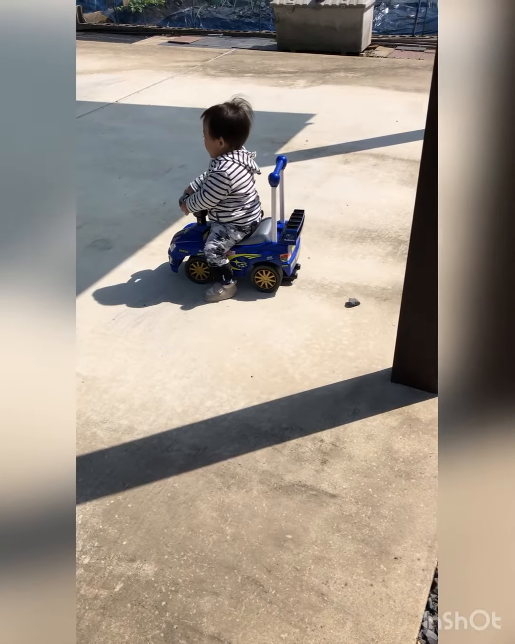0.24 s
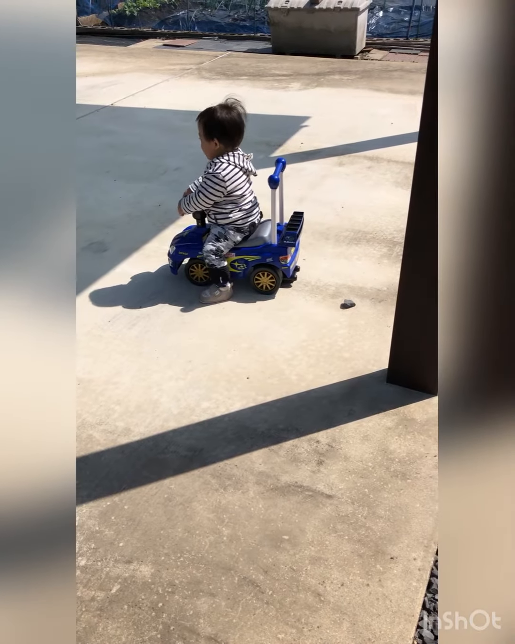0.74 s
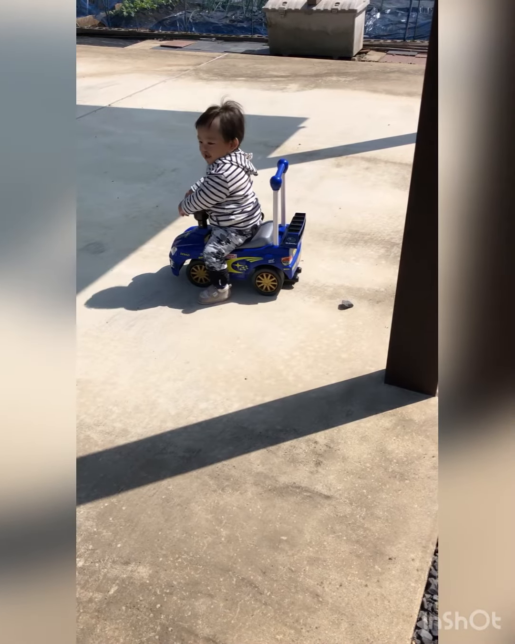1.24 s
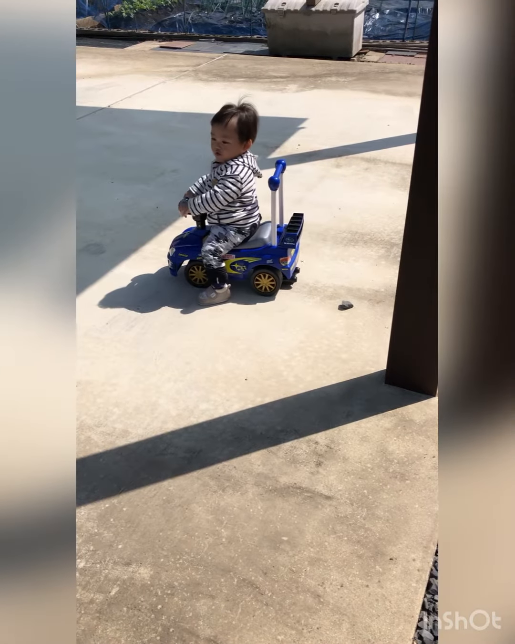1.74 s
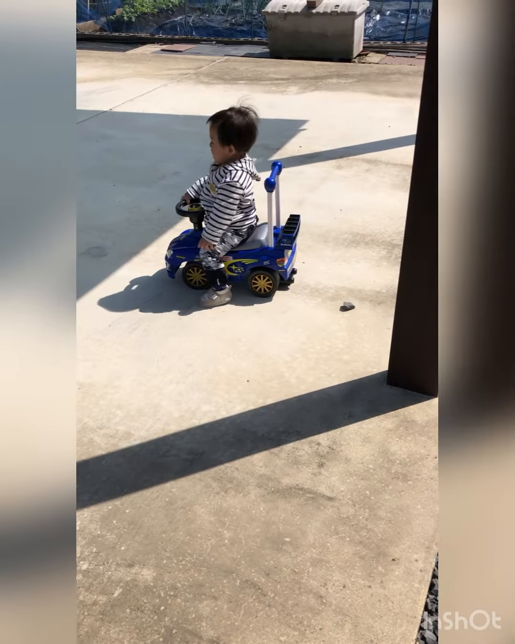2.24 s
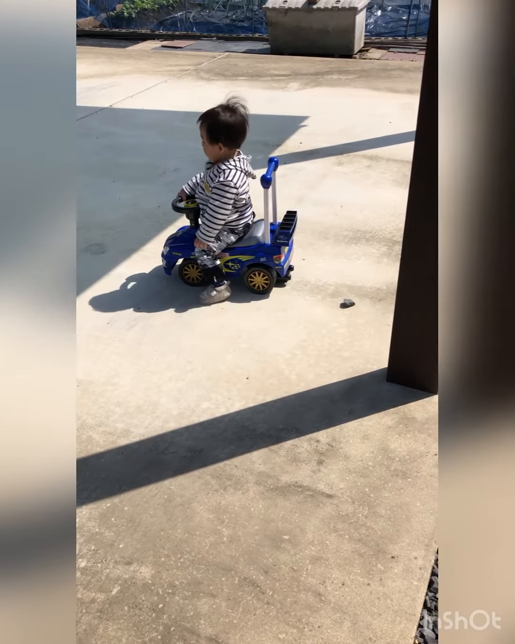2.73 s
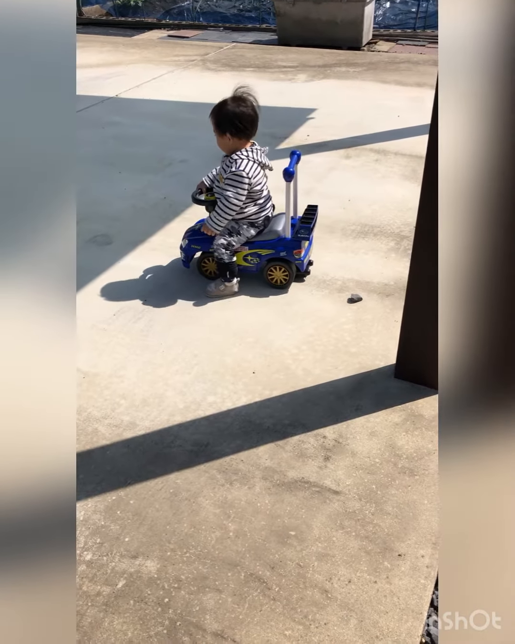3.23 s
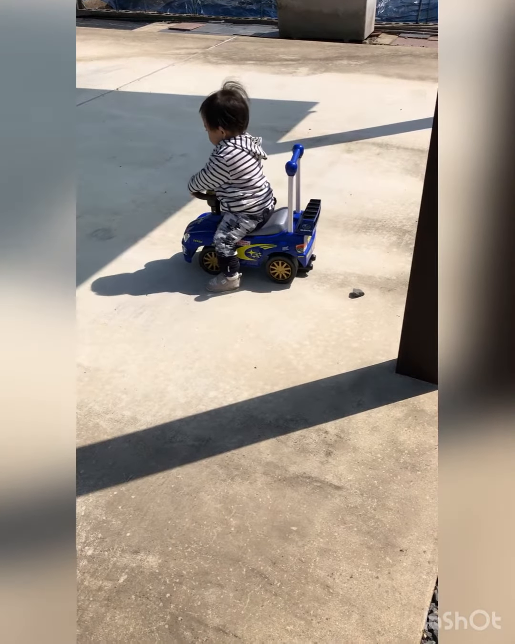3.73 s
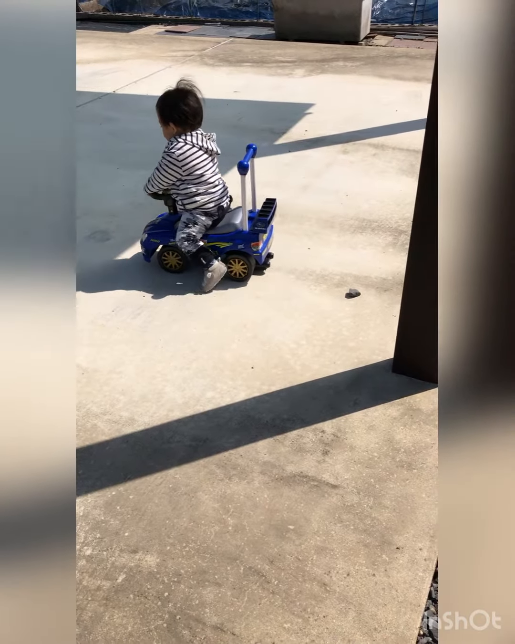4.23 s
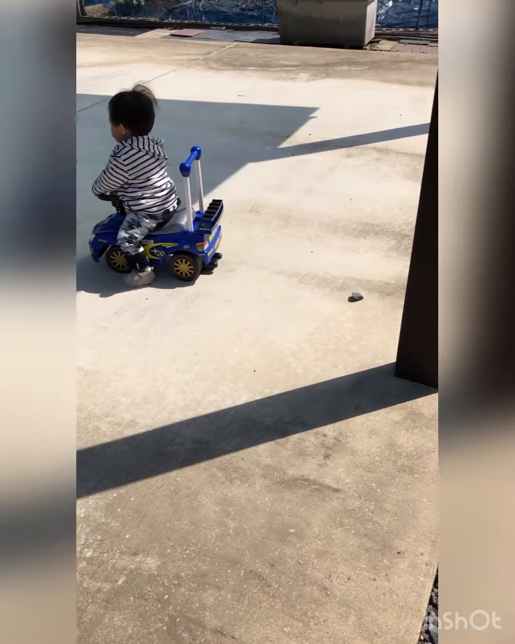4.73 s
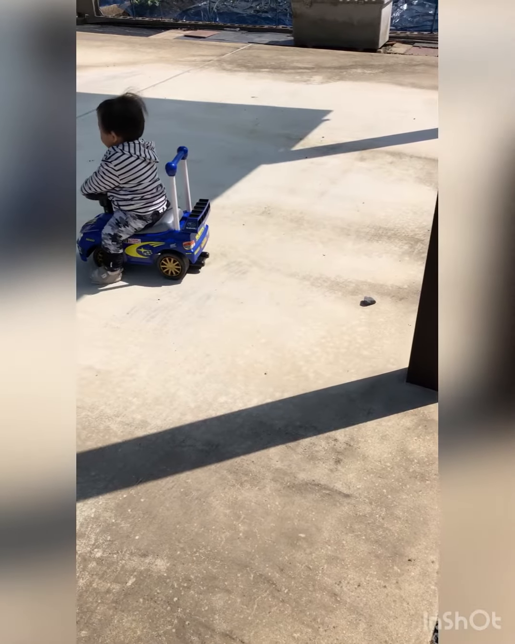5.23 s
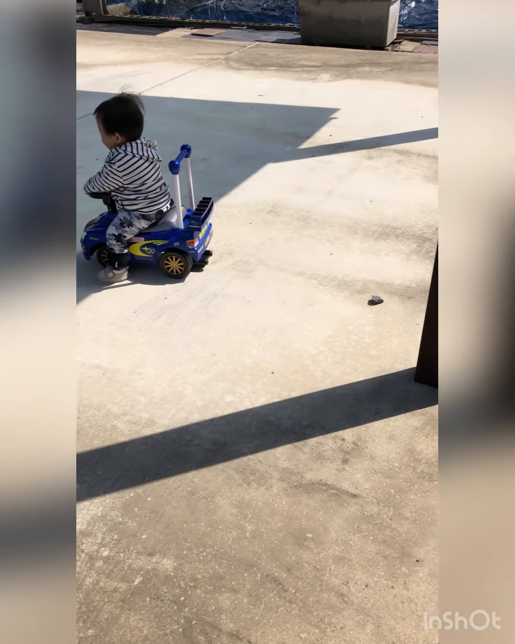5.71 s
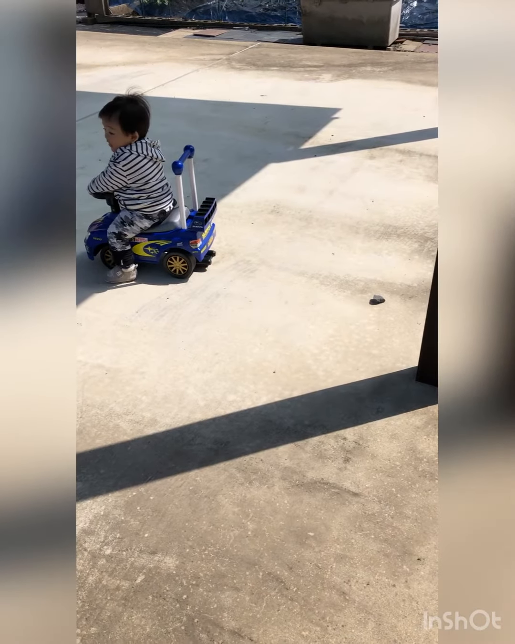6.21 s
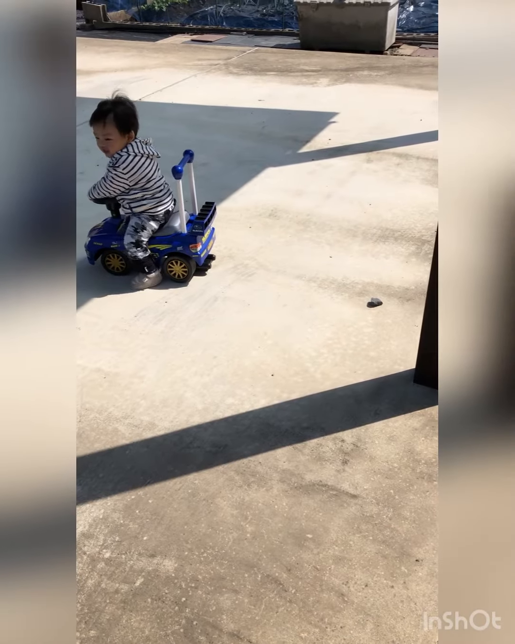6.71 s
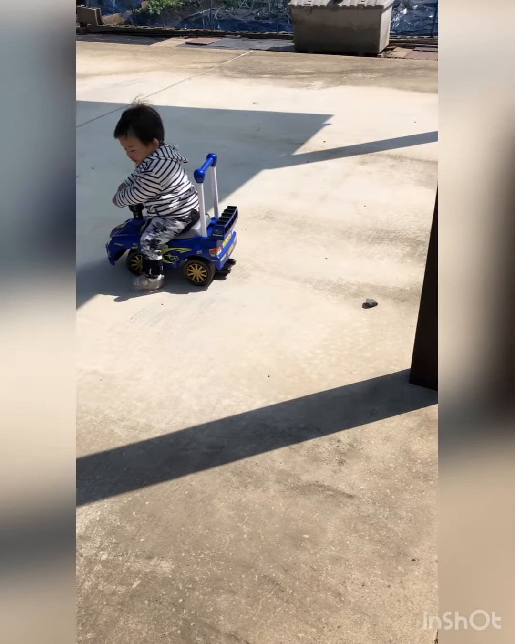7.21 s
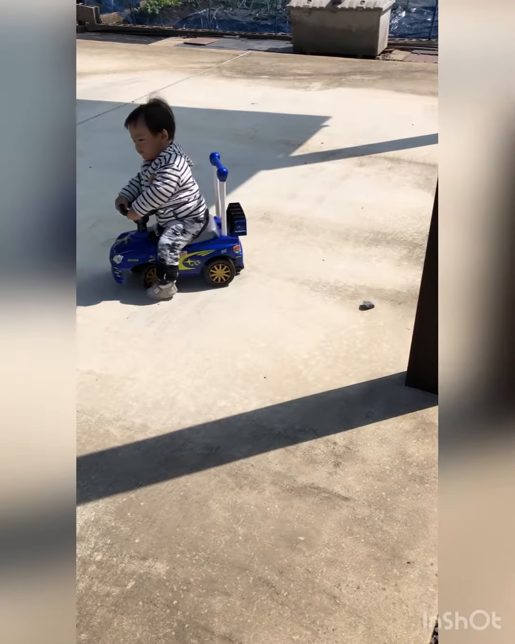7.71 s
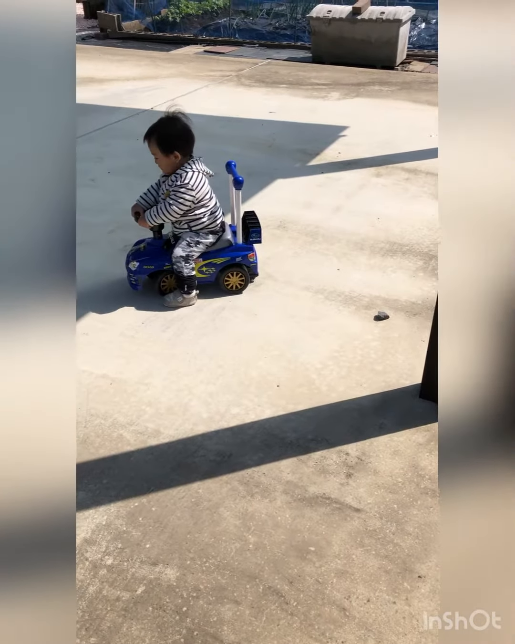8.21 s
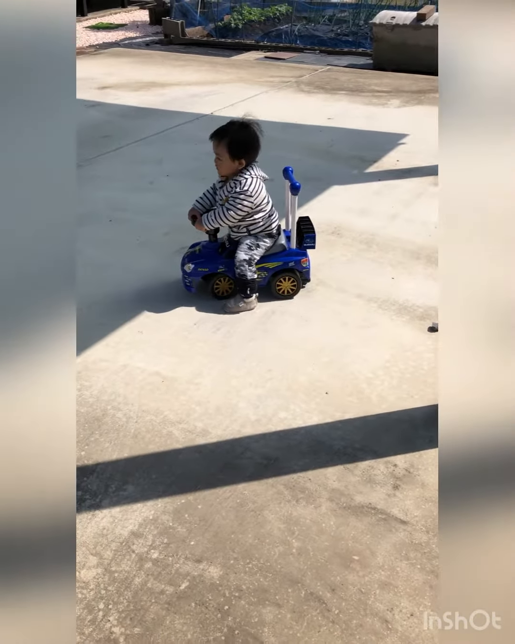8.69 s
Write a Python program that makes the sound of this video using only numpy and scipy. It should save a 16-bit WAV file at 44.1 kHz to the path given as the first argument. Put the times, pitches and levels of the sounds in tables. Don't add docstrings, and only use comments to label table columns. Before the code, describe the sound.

Open yard, dry and quiet, with a faint low rumble of air and distant traffic. From 0 to 1.4 seconds shoes scrape grit in short strokes, with hollow plastic knocks near 0.2, 0.55, 0.9 and 1.35. Then near stillness, only tiny ticks and faint shifts. At 2.8 to 3.4 a brief shove gives a double clack, rattle and scuff. After sparse clicks, a hard roll starts at 4.15: rough grinding, drumming hollow body, wheel rattles and bright snaps, strongest until 4.7, thinning toward a sharp crack at 5.28. A lull follows, with a minute squeak near 6.5. From 6.55 to 7.3 come knocks, clicks and gritty scuffs. A second run builds from 7.45 to the loudest clattering skid at 7.65, fading by 7.9. A heavy knock at 8.1, shoe shuffles, another knock at 8.57 and soft scraping end it.

```python
import sys
import numpy as np
from scipy import signal
from scipy.fft import rfft, irfft, next_fast_len
from scipy.io import wavfile
from scipy.ndimage import uniform_filter1d

SR = 44100
rng = np.random.default_rng(int(sys.argv[2]) if len(sys.argv) > 2 else 0)


def unload_audio(sound):
    columns = np.transpose(np.atleast_2d(sound))
    steps = np.round(np.clip(columns, -1, 1) * 32767)
    wavfile.write(sys.argv[1], SR, steps.astype(np.int16))


def gain_from_db(level_db):
    decades = np.asarray(level_db, float) / 20
    return 10 ** decades


N = 394694
TIME = np.arange(N) / SR

# peak in seconds, swell in seconds, fade in seconds,
# drumming of the hollow body in dB, ring of the wheel shell against it in dB.
ROLLING = [(.215, 0.24, 0.086, -64, 4), (2.915, 0.0085, 0.19, -44, -19), (4.171, 0.084, 0.086, -38.5, -20),
           (4.26, 0.067, 0.082, -37, 3), (4.335, 0.059, 0.098, -35.5, -3), (4.59, 0.27, 0.082, -40.5, -5.5),
           (4.83, 0.54, 0.14, -48, -0.5), (4.9, 0.0068, 0.26, -48, -3), (5.1, .1, 0.25, -60, -2),
           (5.248, 0.07, 0.097, -48, -7), (6.7, 0.036, 0.046, -46, -20), (6.81, 0.035, 0.15, -53, -8),
           (7.0, 0.19, 0.18, -42, -2.5), (7.46, .015, 0.12, -63, 6), (7.51, 0.07, 0.28, -45.5, -15),
           (7.58, 0.093, 0.25, -40, 0), (7.66, 0.024, 0.11, -36, 9), (7.752, 0.023, 0.062, -37.5, 6.5),
           (7.852, 0.023, 0.058, -46.5, 9.5)]
# frequency in Hz, width in Hz, level in dB.
SHELL_MODES = [(640, 100, -8), (728, 205, 3), (920, 88, 1), (1001, 68, -2.5), (1400, 150, -7)]


def evened(x):
    return x / np.sqrt(np.mean(x ** 2) + 1e-20)


def read(points, hz):
    f, value = np.transpose(points)
    return np.interp(np.log(hz + 1), np.log(f + 1), value)


def coloured(x, spectrum):
    size = next_fast_len(len(x))
    gain = gain_from_db(read(spectrum, np.fft.rfftfreq(size, 1 / SR)))
    return evened(irfft(rfft(x, size) * gain, size)[:len(x)])


def wander(seconds):
    size = max(int(seconds * SR / 20), 2)
    slow = uniform_filter1d(rng.standard_normal(N // 20 + 2), size)
    slow = uniform_filter1d(slow, size)
    return evened(np.interp(TIME, np.arange(len(slow)) * 20 / SR, slow))


def resonate(x, hz, width):
    turn = np.exp(2j * np.pi * np.cumsum(hz) / SR)
    r = np.exp(-np.pi * width / SR)
    slow = signal.lfilter([1], [1, -2 * r, r ** 2], x / turn + 1e-18)
    return (turn * slow).real


def rung(x, modes, shift_db, bend):
    out = np.zeros(N)
    for f, width, db in modes:
        level = gain_from_db(db + shift_db * wander(0.025))
        hz = f * (1 + bend * wander(0.12))
        out += level * evened(resonate(np.diff(x, prepend=0), hz, width))
    return evened(out)


def grains(per_s, spread_db, clump_db):
    size = gain_from_db(spread_db * np.minimum(rng.exponential(1, N), 4) + clump_db)
    return size * rng.choice([-1., 1.], N) * (rng.random(N) < per_s / SR)


def stroked(rows, roundness, dulling):
    edge_db = 20
    ms = np.arange(0, N / SR, 1 / 1000)
    peak, swell, fade, db, upper_db = np.array(rows).T[:, :, None]
    span = np.where(ms < peak, np.maximum(swell, 1 / 500), np.maximum(fade, 1 / 500))
    way = (ms - peak) / span
    down_db = np.minimum(edge_db * abs(way) ** roundness, 200)
    upper_down_db = down_db * (1 + dulling * (way > 0))
    layers = db - down_db, db + upper_db - upper_down_db
    return np.array([np.interp(TIME, ms, (gain_from_db(x) ** 2).sum(0)) for x in layers])


def add(mix, s, sound):
    part = mix[round(s * SR):][:len(sound)]
    part += sound[:len(part)]


def jolts():
    drumming = 10 * np.log10(stroked(ROLLING, 0.89, 0)[0] + 1e-12)
    rolling = np.clip((drumming + 64) / 10, 0, .25)
    hits = abs(grains(130, 3., 0))
    power = signal.lfilter([1], [1, -np.exp(-1 / (.005 * SR))], hits) ** 2
    power = power / (uniform_filter1d(power, SR // 20) + .05 * power.mean())
    return np.sqrt(1 - rolling + rolling * power)


def scrape(force):
    # peak in seconds,
    # swell in seconds, fade in seconds, peak level in dB, treble above 8 kHz in dB.
    scuffs = [(0, .01, 0.057, -61, -29), (.096, 0.0045, 0.22, -52.5, -11), (.205, 0.12, 0.14, -50, -8),
              (.48, 0.038, 0.13, -51.5, -4), (.693, 0.0028, 0.16, -56, -11), (.87, 0.15, 0.092, -46, -6),
              (1.24, 0.082, 0.17, -48.5, -3.5), (2.834, 0.06, 0.044, -50.5, -1),
              (3.125, 0.017, 0.032, -50, -2), (3.26, 0.18, 0.1, -48.5, -2), (6.84, 0.047, 0.052, -50.5, -5),
              (7.16, 0.1, 0.078, -53, -1.5), (7.288, 0.12, 0.12, -47, -5), (8.03, 0.11, 0.17, -54, -5.5),
              (8.22, 0.0048, 0.069, -51, -4.5), (8.33, 0.12, 0.055, -54, -5),
              (8.49, 0.056, 0.051, -50.5, -4), (8.86, 0.19, 0.18, -50.5, -5)]
    skids = [(2.935, 0.22, 0.1, -57, -15), (4.17, 0.12, 0.35, -51, -12), (4.33, 0.17, 0.17, -44.5, -4),
             (4.56, 0.18, 0.28, -49.5, -3), (4.82, 0.15, 0.041, -54.5, -8.5),
             (4.92, 0.045, 0.091, -55, -11), (5.0, 0.023, 0.1, -53.5, -3), (5.1, 0.016, 0.13, -54.5, 4),
             (5.26, 0.17, 0.14, -57.5, -14), (6.67, 0.052, 0.35, -59, -26), (6.92, 0.033, 0.41, -52, -1),
             (7.47, .02, .1, -75, -6), (7.658, 0.14, 0.14, -36, -11), (7.74, 0.029, 0.055, -41, -8),
             (7.85, 0.05, 0.076, -54.5, -26), (8.577, 0.03, 0.082, -54, -20)]
    fidgets = [
        (1.0, 0.11, 0.071, -61.5, -4),
        (1.65, 0.23, 0.18, -64, -6),
        (1.776, 0.074, .05, -65.5, -4),
        (1.85, 0.028, 0.11, -64.5, -7),
        (1.98, 0.01, 0.045, -67, -3),
        (3.43, 0.11, 0.11, -63.5, -6),
        (3.8, 0.066, 0.54, -65.5, -7),
        (6.26, 0.12, 0.12, -65, -28),
        (6.495, 0.02, 0.066, -67, -7),
        (6.56, 0.038, 0.046, -68, -5),
    ]
    # frequency in Hz, level in dB per Hz.
    grit_spectrum = [(250, -2.5), (500, -5), (900, -5), (1400, -3), (2500, -3), (4000, -10), (6000, -4.5),
                     (8000, -13), (10000, -19.5)]
    fizz_spectrum = [(5000, -29), (8500, -8.5), (10000, -14), (13000, -16.5), (15000, -29), (17000, -38)]
    # frequency in Hz, width in Hz, level in dB.
    rim_modes = [(2205, 68, 2), (2470, 100, -2), (2722, 150, 1), (3134, 310, 4), (3550, 230, 3.5),
                 (3950, 150, 1), (4122, 150, 4.5), (4680, 200, 0), (5240, 400, -2)]
    rest_db = -84.5
    sole_hz, sole_width_hz, sole_db = 5100, 5000, -5.5
    sole_octave_db = 10.5

    power = stroked(scuffs, 1.67, 0.9) + stroked(skids + fidgets, 1.13, 0.43)
    level, treble = np.sqrt(power + gain_from_db(rest_db) ** 2)
    grit = evened(grains(12000, 2.5, 1.3 * wander(.004)) * force)
    rim = gain_from_db(-5.5) * rung(grit, rim_modes, 4., .04)
    shell = gain_from_db(-7.5) * rung(grit, SHELL_MODES, 3., .02)
    ring_hz = sole_hz * (treble / level) ** (20 / np.log2(10) / sole_octave_db)
    ring_hz = np.clip(ring_hz, SR / 20, SR / 6)
    sole = gain_from_db(sole_db) * evened(resonate(grit, ring_hz, sole_width_hz))
    low = evened(coloured(grit, grit_spectrum) + rim + shell + sole)
    fizz = gain_from_db(-3.5 + 3.2 * wander(0.008)) * coloured(grit, fizz_spectrum)
    return level * low + treble * fizz


def roll(force):
    # frequency in Hz, width in Hz, level in dB.
    body_modes = [(196, 103, -2), (223, 80, -5.5), (320.3, 45, -5), (349, 132, 0), (449, 260, -11)]
    body, shell = np.sqrt(stroked(ROLLING, 0.89, 0.34))
    bumps = grains(1200, 2.5, 0) * force
    drumming = body * rung(bumps, body_modes, 2.65, 0.029)
    return drumming + shell * gain_from_db(-2.45) * rung(bumps, SHELL_MODES, 4., 0.015)


def knocks():
    # start in seconds, peak level in dB, wheel shell pitch in Hz, body pitch in Hz.
    stops = [(.094, -56, 1040, 186), (0.227, -32.5, 947, 319), (0.469, -48, 1010, 234),
             (0.506, -42.5, 1000, 244), (0.552, -38.5, 950, 311), (.908, -36, 1360, 303),
             (1.347, -34, 790, 240), (2.804, -46, 800, 320), (2.91, -33, 785, 305),
             (2.934, -34.5, 1220, 287), (2.979, -42.5, 970, 345), (3.814, -40.5, 1010, 182),
             (5.239, -38.5, 820, 339), (6.558, -44, 835, 310), (6.701, -38, 695, 296),
             (6.987, -31, 730, 230), (7.497, -42, 690, 337), (8.105, -27, 880, 200)]
    bumps = [(0.3, -46, 844, 320), (3.315, -42, 1190, 253), (3.388, -46.5, 1380, 362),
             (3.485, -46.5, 1280, 190.1), (4.127, -36.5, 800, 242), (4.253, -29.5, 895, 161),
             (4.326, -28, 970, 273), (4.388, -30, 840, 236), (4.526, -43, 1390, 187),
             (4.566, -32.5, 1360, 196), (4.696, -39.5, 1400, 401.5), (5.008, -47, 836, 300),
             (4.625, -33.5, 890, 189), (4.904, -34, 830, 302), (5.209, -37, 1360, 267),
             (5.352, -47, 1330, 163), (6.675, -42, 870, 196), (6.795, -45, 945, 390),
             (7.039, -41.5, 1360, 300), (7.087, -50, 568, 223), (7.148, -46, 832, 337),
             (7.272, -46, 825, 330), (7.406, -38.5, 790, 333), (7.455, -37, 824, 249),
             (7.653, -25, 980, 238), (7.745, -44, 920, 210), (8.095, -35.5, 1251, 310),
             (8.569, -27, 850, 247.4)]
    sag = 0.23
    out, t = np.zeros(N), np.arange(6000) / SR
    blows = [(*row, -1.5) for row in stops] + [(*row, -3.5) for row in bumps]
    for s, peak_db, shell_hz, body_hz, body_db in blows:
        pair = rng.uniform(1.078, 1.583, 4)
        turn = 2 * np.pi * shell_hz * (t + sag * 0.0018 * (1 - np.exp(-t / 0.0013)))
        shell = np.sin(turn) + 0.43 * np.sin(turn * pair[0]) + 0.65 * np.sin(turn / pair[1])
        shell = shell * gain_from_db(-60 * t / 0.021) * np.minimum(t / .0025, 1)
        shell = shell / abs(shell).max()
        body = np.sin(2 * np.pi * body_hz * t) + 0.53 * np.sin(2 * np.pi * body_hz * pair[2] * t)
        body = body * gain_from_db(-60 * t * body_hz / 22) * (1 - np.exp(-(t * body_hz / 0.44) ** 2))
        add(out, s, gain_from_db(peak_db) * (shell + gain_from_db(body_db) * body))
        add(out, s + pair[3] ** 2 / 100, gain_from_db(peak_db - 18.5) * shell)
    return out


def clicks():
    # start in seconds, peak level in dB, centre frequency in Hz.
    pings = [(.2279, -28.5, 2100), (.552, -34, 3590), (1.765, -50, 4220), (1.844, -55, 2130),
             (2.9095, -31.5, 3110), (2.9748, -36.5, 3320), (4.2552, -31, 2080), (4.7473, -36, 1850),
             (4.9009, -27.5, 2050), (4.9863, -37.5, 3560), (5.131, -35.5, 3340), (5.2076, -42, 3040),
             (5.8235, -51.5, 2720), (6.557, -39, 2229), (6.6356, -30, 4280), (6.6778, -38.5, 2499),
             (6.795, -42, 3350), (6.826, -37, 6120), (7.005, -36, 3240), (5.504, -60, 4440),
             (7.1463, -27, 6000), (7.453, -38.5, 2280), (8.0954, -40.5, 2460), (8.5706, -30, 2300),
             (8.6045, -36.5, 5370)]
    chatter = [(1.3465, -36.5, 8600), (3.035, -49, 7040), (1.846, -41.5, 7220), (1.846, -46, 1590),
               (2.94, -47, 3840), (7.5625, -36, 8040), (3.813, -46.5, 2580), (7.466, -47, 9100),
               (4.126, -36, 2520), (4.172, -36, 2550), (4.236, -33, 3380), (4.981, -44, 2300),
               (5.131, -44.5, 2340), (7.1465, -32, 2720), (7.024, -46, 2720), (4.2216, -37, 1520),
               (4.3198, -29, 3820), (4.346, -30.5, 3200), (4.4331, -37, 7900), (4.465, -42, 4500),
               (4.566, -35.5, 2760), (4.6341, -40.5, 3680), (4.6655, -41, 1570), (4.7863, -42, 1750),
               (4.8063, -42, 2550), (4.8263, -35, 2280), (5.0053, -40, 2540), (5.168, -45, 5140),
               (6.7452, -46, 2080), (6.85, -48, 2680), (6.904, -39, 8000), (6.9717, -43, 2900),
               (7.006, -39.5, 2120), (7.016, -37, 3270), (7.0421, -41, 5280), (7.054, -43, 4450),
               (7.218, -43, 4550), (7.2371, -43, 5250), (7.4835, -49, 3700), (7.4925, -43, 2070),
               (7.5175, -44, 3530), (7.564, -43, 1570), (7.5824, -44, 1590), (7.602, -34, 2670),
               (7.634, -24, 1580), (7.683, -26, 2410), (7.742, -30.5, 2200), (7.8562, -42, 2340)]
    rattles = [(.908, -39, 2760), (.983, -43, 9000), (1.035, -50, 5300), (2.9415, -32, 6960),
               (3.7847, -44, 3500), (7.5814, -37, 8000), (4.0392, -49, 6830), (4.07, -47, 5300),
               (4.114, -35, 5200), (4.3111, -30, 5420), (4.3274, -29, 3390), (4.3594, -30, 8150),
               (4.45, -37.5, 4540), (8.07, -38, 6500), (4.6906, -37, 6400), (4.8828, -40, 2240),
               (5.0904, -33.5, 6000), (5.2357, -29, 5900), (5.3393, -45, 4530), (6.5945, -53, 2640),
               (6.782, -37.5, 3520), (6.9113, -35.5, 2630), (6.9451, -30, 8500), (7.653, -20.5, 3940),
               (7.728, -25.5, 5150)]
    snaps = [(.42, -44, 9000), (1.346, -32.5, 3400), (3.1147, -36, 5300), (3.424, -36, 2830),
             (3.7188, -43.5, 2005), (4.1712, -20.5, 7700), (4.3878, -24.5, 4520), (4.4842, -33.5, 3560),
             (4.5452, -32, 2680), (5.02, -33.5, 8360), (5.2793, -18.5, 2910), (5.3736, -48, 1940),
             (8.0596, -31.5, 7100), (8.4317, -43.5, 3740)]
    # start in seconds, peak level in dB.
    ticks = [(0.4503, -51), (0.9594, -47), (1.0006, -46), (1.929, -51.5), (2.1927, -56), (7.4522, -46),
             (2.656, -53.5), (3.707, -55), (3.8508, -44.5), (3.8874, -51), (3.9569, -51), (3.9926, -51),
             (4.0852, -40.5), (4.6426, -40), (4.769, -36.5), (.947, -55), (1.12, -59), (1.19, -43),
             (8.64, -59), (8.943, -37)]
    panel_hz = np.array([2050, 2800, 3450, 4450, 5370, 7200, 9200])
    panel_width_hz, panel_valley = 160, .7
    crack, crack_s = .4, .001

    out, t = np.zeros(N), np.arange(4096) / SR
    hz = np.fft.rfftfreq(4096, 1 / SR) + 1
    edges = hz ** 2 / (hz ** 2 + 1500 ** 2) / (1 + (hz / 14500) ** 6)
    off = (hz[:, None] - np.array(panel_hz)) / panel_width_hz * 2
    panel = panel_valley + (1 / (1 + off ** 2)).sum(1)
    ticks = [(*row, 6900) for row in ticks]
    # rows, width in octaves, t60 in seconds
    kinds = [(pings, .6, .026), (chatter, .4, .02), (rattles, 1.7, .034), (snaps, 2.8, .024), (ticks, 4., .03)]
    for rows, octaves, t60 in kinds:
        decay_s = max(t60, .006)
        for s, peak_db, centre_hz in rows:
            away = np.log2(hz / centre_hz) / max(octaves, .1)
            colour = gain_from_db(-6 * np.minimum(abs(away), 8)) * edges * panel
            crackle = evened(irfft(rfft(rng.standard_normal(len(t))) * colour))
            steps = np.array([0, -1, 1]) * rng.uniform(0.262, 0.64, 3) * min(octaves, 1)
            modes_hz = centre_hz * 2 ** steps
            rings = np.sin(2 * np.pi * np.outer(t, modes_hz)) @ [1.5, .12, .12]
            rings = gain_from_db(-5 - 2 * min(octaves, 4) - 45 * t / decay_s) * rings
            sound = crackle * (gain_from_db(-60 * t / decay_s) + crack * np.exp(-t / crack_s)) + rings
            sound = sound * np.minimum(t / 0.00022, 1)
            add(out, s, gain_from_db(peak_db) * sound / abs(sound).max())
    return out


def rubs():
    # start in seconds, length in seconds,
    # first frequency in Hz, last frequency in Hz, level in dB.
    singing = [(0.12, 0.11, 970, 930, -56.5), (0.482, 0.047, 3100, 3000, -53),
               (.465, 0.036, 5200, 5200, -54), (2.803, 0.055, 5600, 5390, -50),
               (3.188, 0.11, 2250, 2400, -55.5), (3.214, 0.099, 3200, 3100, -56),
               (3.247, 0.083, 4160, 4400, -52.5), (4.152, 0.04, 1100, 1120, -50),
               (4.188, 0.15, 3350, 4300, -55), (4.303, .04, 4000, 3600, -50),
               (4.305, 0.02, 5500, 5430, -52), (4.359, 0.022, 1500, 920, -46.5),
               (4.743, 0.033, 4000, 3920, -55), (6.815, 0.065, 1000, 1100, -59),
               (6.897, 0.054, 2500, 2500, -61), (7.505, 0.074, 1020, 1000, -50),
               (7.529, 0.081, 3650, 3470, -51.5), (7.604, 0.06, 2650, 2500, -47),
               (7.613, 0.024, 1600, 1640, -42), (7.65, 0.043, 4100, 4100, -37),
               (7.656, 0.026, 980, 950, -27), (7.68, 0.037, 930, 960, -40), (4.24, 0.048, 1060, 930, -44),
               (4.901, 0.023, 830, 827, -41), (5.279, 0.019, 2100, 2100, -51),
               (7.266, 0.048, 4050, 4000, -49), (7.286, .05, 3400, 3220, -59),
               (8.104, 0.088, 1330, 1210, -59), (0.79, 0.13, 2300, 2350, -56),
               (0.807, 0.09, 3300, 3220, -52), (1.3, 0.068, 3000, 3300, -55), (7.55, .1, 380, 340, -47),
               (6.8, 0.041, 1400, 1330, -57), (1.843, .025, 2204, 2210, -58),
               (8.566, 0.01, 1292, 750, -43.5), (7.738, 0.08, 960, 953, -37.5), (7.83, 0.07, 309, 297, -48),
               (7.793, 0.15, 2300, 2320, -60), (8.021, 0.067, 3200, 3080, -59),
               (8.099, 0.073, 950, 893, -56)]
    drones = [(0, 0.032, 150, 140, -50), (.055, 0.054, 125, 120, -54.5), (2.506, 0.091, 90, 88.02, -61),
              (2.67, 0.054, 89, 85, -58), (5.069, 0.072, 138, 120, -50.5), (.9, 0.046, 159, 152, -48.5),
              (0.551, 0.049, 151, 149, -57), (3.812, 0.026, 433, 399, -53.5),
              (4.325, 0.052, 261, 247, -42.5), (4.751, 0.027, 245, 232, -44), (4.797, 0.094, 236, 228, -51),
              (6.974, 0.05, 296, 250, -45), (7.496, 0.072, 354, 344, -38.5),
              (7.655, 0.031, 256.4, 247, -31.5), (7.3, 0.051, 370, 360, -69), (7.6, 0.027, 330, 320, -36.5),
              (8.108, 0.018, 211, 209, -42)]
    width = 0.048
    flutter = 0.61
    early = 0.6
    out = np.zeros(N)
    for s, length, first_hz, last_hz, db in singing + drones:
        a, b = rng.standard_normal((2, 8000))
        way = np.linspace(0, 1, int(np.clip(length, .01, .15) * SR))
        r = np.exp(-np.pi * width * first_hz / SR)
        slow = signal.lfilter([1], [1, -r], a + 1j * b)[-len(way):]
        turn = np.exp(2j * np.pi * np.cumsum(first_hz + (last_hz - first_hz) * way) / SR)
        tone = evened((turn * slow / abs(slow) ** (1 - flutter)).real)
        add(out, max(s, 0), gain_from_db(db) * tone * np.sin(np.pi * way ** early))
    return out


def squeak():
    # start in seconds, length in seconds, slip rate in Hz, level in dB.
    slips = [
        (6.483, .02, 1490, -64.5),
    ]
    out = np.zeros(N)
    for s, length, hz, db in slips:
        t = np.arange(int(max(length, .008) * SR)) / SR
        stack = np.sin(2 * np.pi * np.outer(hz * t, [2, 3, 4])) @ [1, .5, 1]
        add(out, s, gain_from_db(db) * stack * np.sin(np.pi * t / t[-1]))
    return out


def yard(x):
    # frequency in Hz, t60 in seconds.
    decay = [(300, 0.59), (1500, 0.25), (4000, 0.38), (10000, 0.19)]
    taps = np.zeros(SR // 2)
    at = np.arange(200, len(taps) - 20, 20)
    taps[at + rng.integers(0, 20, len(at))] = rng.choice([-1., 1.], len(at))
    hz, t, z = signal.stft(taps, SR, nperseg=256)
    z = z * gain_from_db(-60 * t / read(decay, hz)[:, None])
    tail = signal.istft(z, SR, nperseg=256)[1]
    return signal.fftconvolve(x, tail / np.linalg.norm(tail))[:N]


def air():
    # frequency in Hz, level in dB per Hz.
    air_spectrum = [(15, -46), (25, -10.5), (76, -3.5), (157, -11.5), (185, -17.5), (229, -15.5),
                    (277, -19), (317, -16.5), (439, -24.5), (695, -23), (2160, -39), (9840, -49),
                    (16000, -51.5)]
    # time in seconds, level in dB.
    rumble = [(0, -59), (.09, -67.5), (.16, -66.5), (2.3, -65), (2.55, -63), (2.801, -69), (4.1, -69.5),
              (4.33, -69.5), (5.04, -63.5), (5.11, -53.5), (5.2, -65.5), (8.95, -66.5)]
    hiss = coloured(rng.standard_normal(N), [(90, -33.0), (150, -1.5), (20000, -4.0)])
    low = coloured(rng.standard_normal(N), [(130, -6.0), (170, -28)])
    s, db = np.transpose(rumble)
    swell_db = np.interp(TIME, s, db) - np.mean(db) + 0.31 * wander(0.042)
    both = hiss * gain_from_db(1. * wander(0.047)) + gain_from_db(-20) * low * gain_from_db(swell_db)
    return gain_from_db(-59.5) * coloured(both, air_spectrum)


def scene():
    force = jolts()
    toy = scrape(force) + roll(force) + clicks() + knocks() + squeak() + rubs()
    return (toy + gain_from_db(-16.5) * yard(toy) + air())[None]


def roll_off(x):
    return signal.sosfilt(signal.butter(12, 16510, fs=SR, output="sos"), x)


def record(dry):
    # frequency in Hz, response in dB.
    microphone = [(20, -30), (45, 0), (15600, 0), (15850, -45)]
    heard = coloured(dry[0], microphone) * np.std(dry)
    return roll_off(heard[None])


dry = scene()
out = record(dry)
unload_audio(out)
```